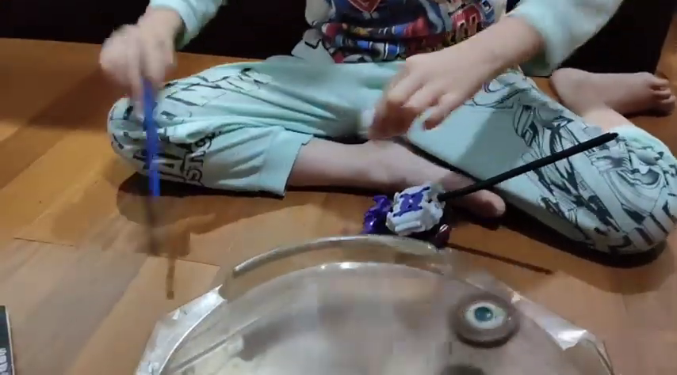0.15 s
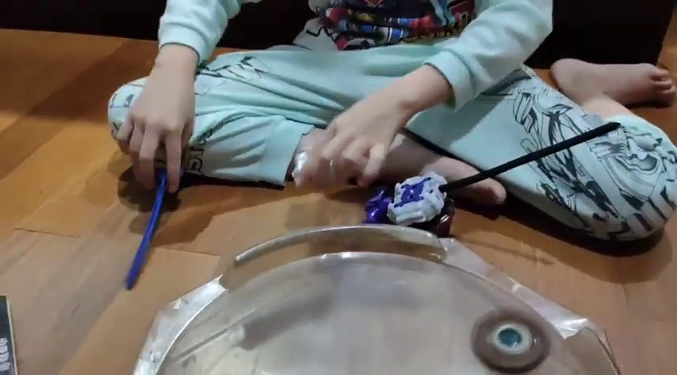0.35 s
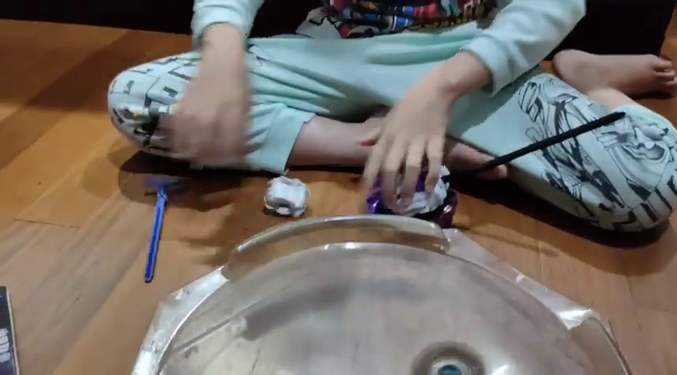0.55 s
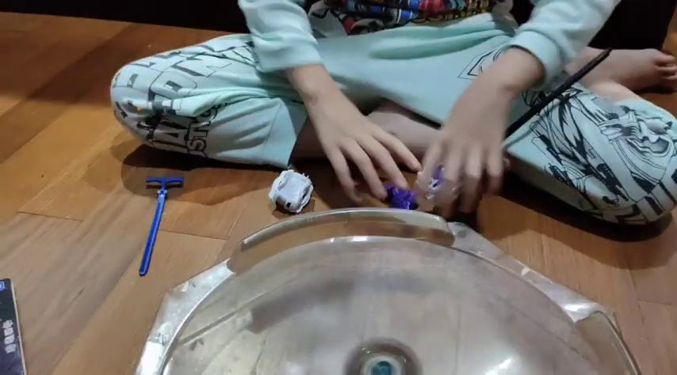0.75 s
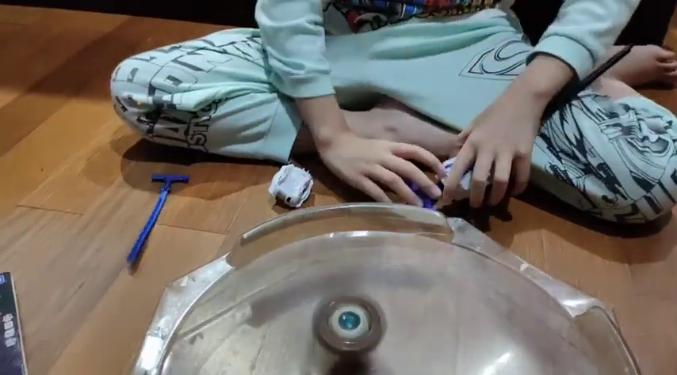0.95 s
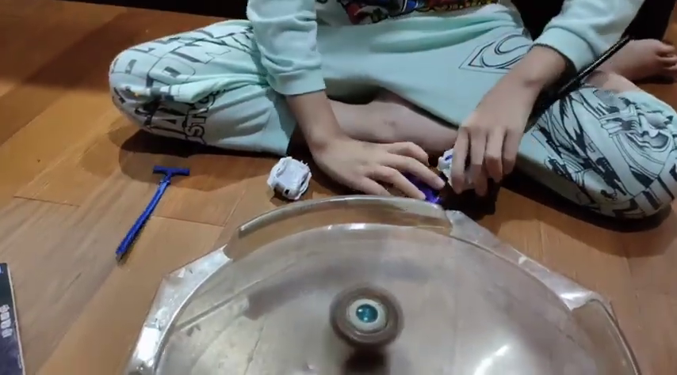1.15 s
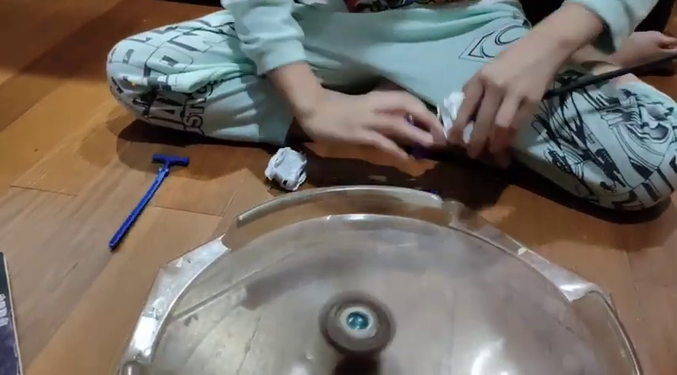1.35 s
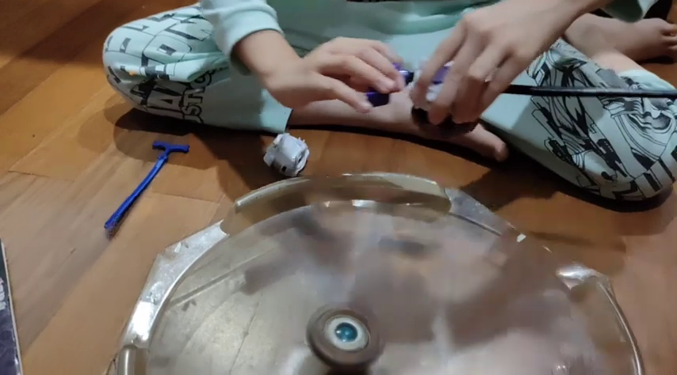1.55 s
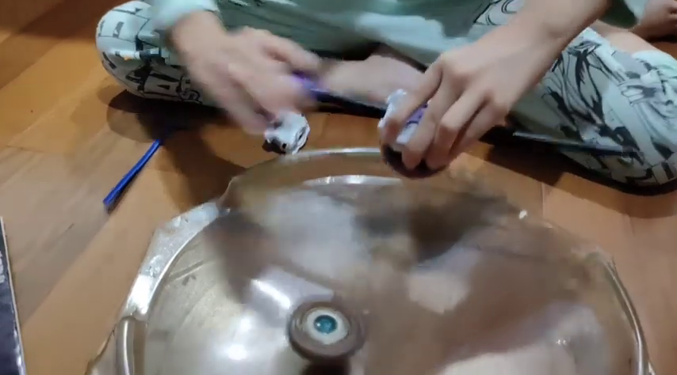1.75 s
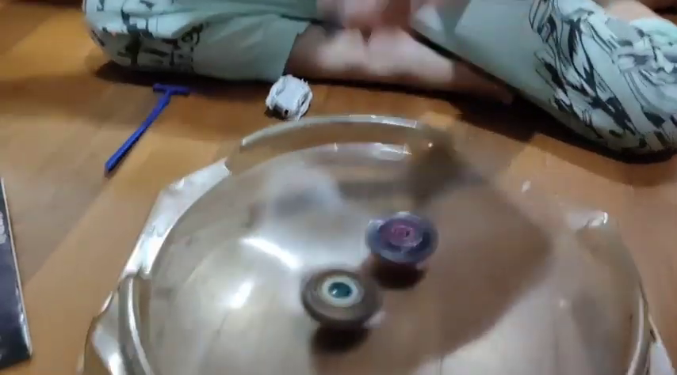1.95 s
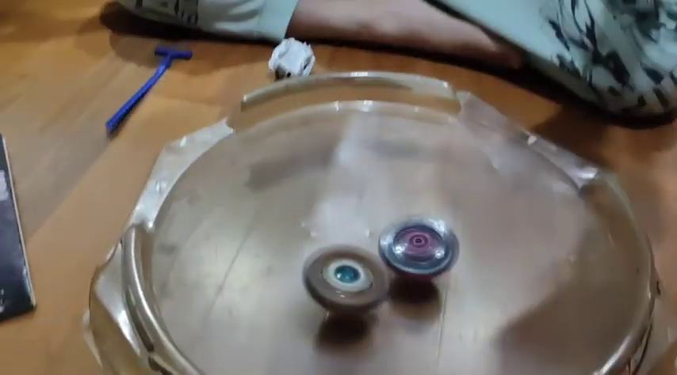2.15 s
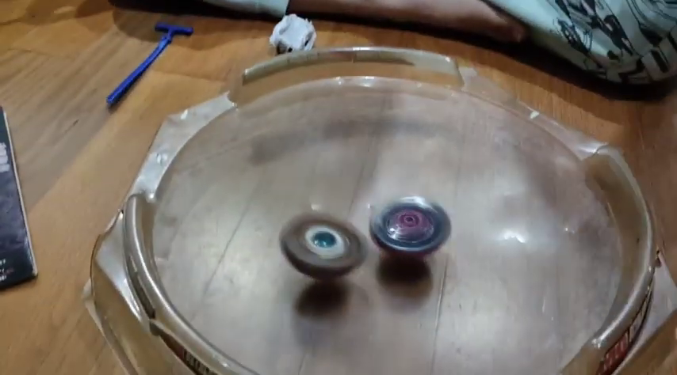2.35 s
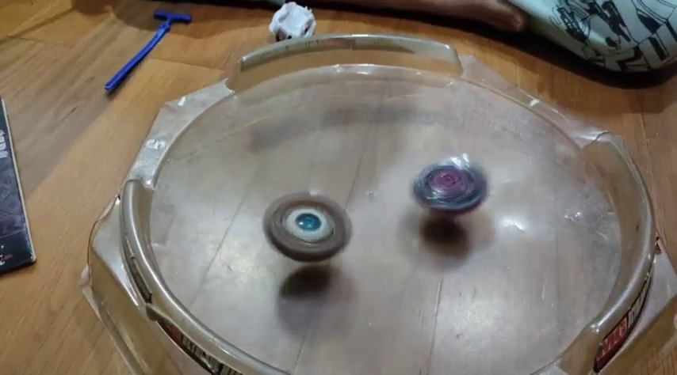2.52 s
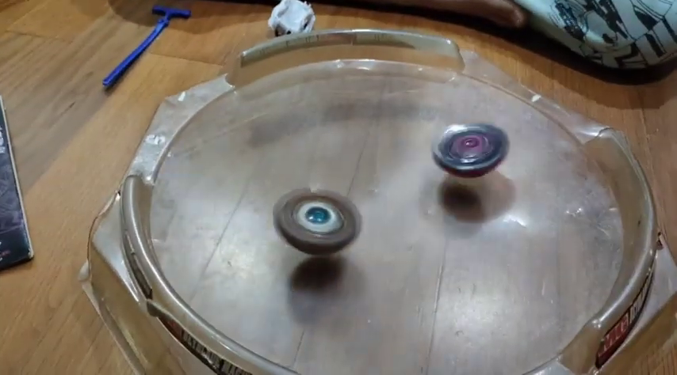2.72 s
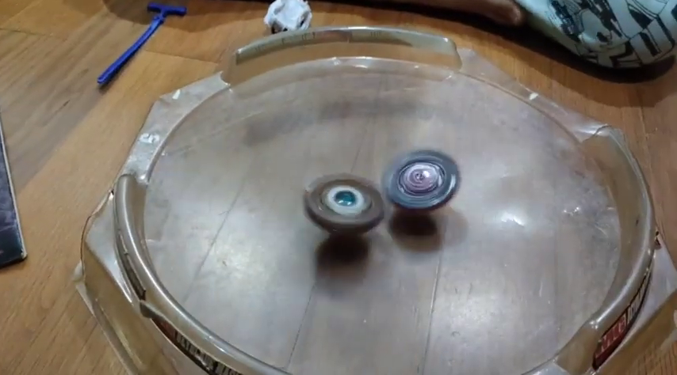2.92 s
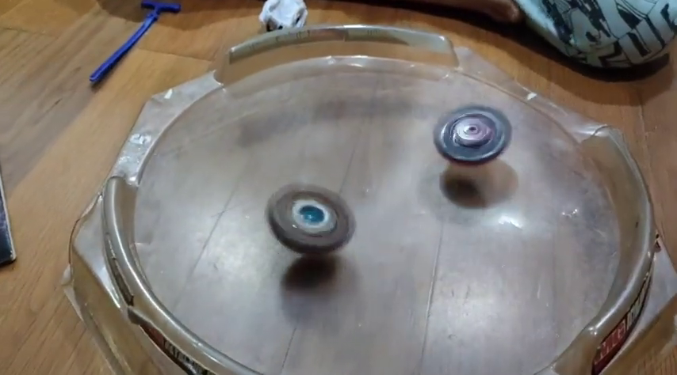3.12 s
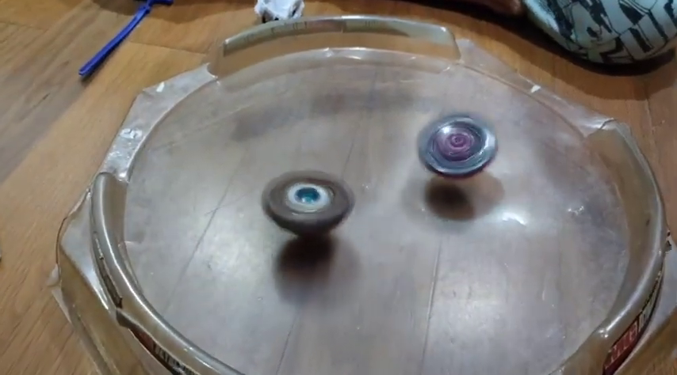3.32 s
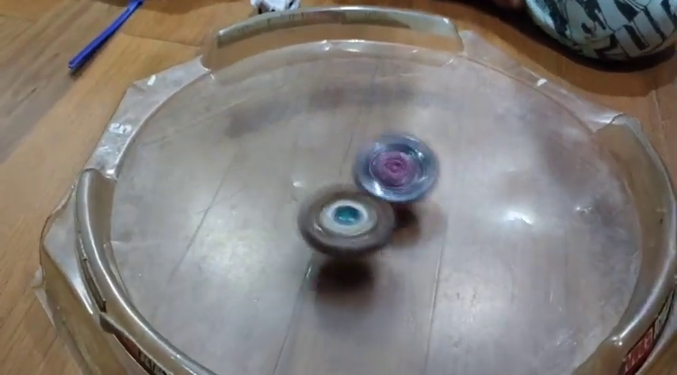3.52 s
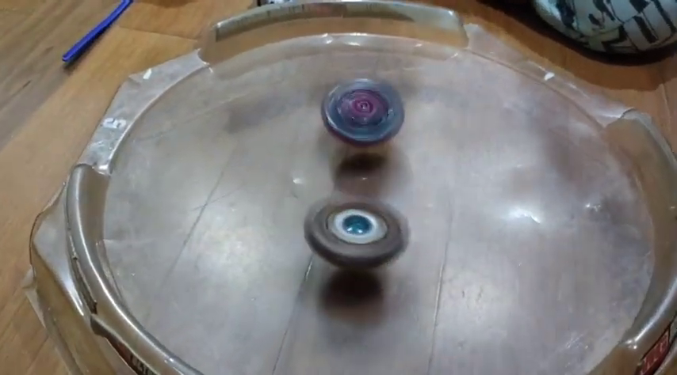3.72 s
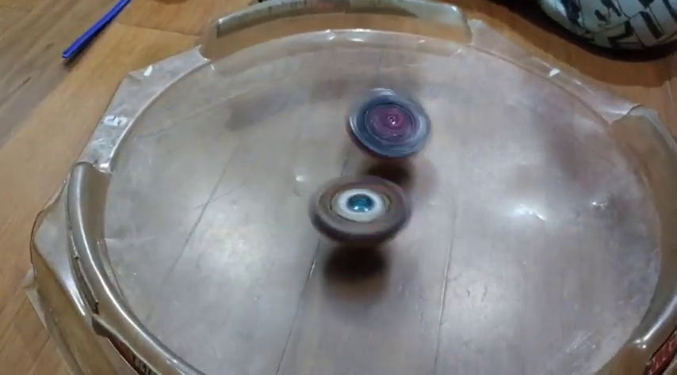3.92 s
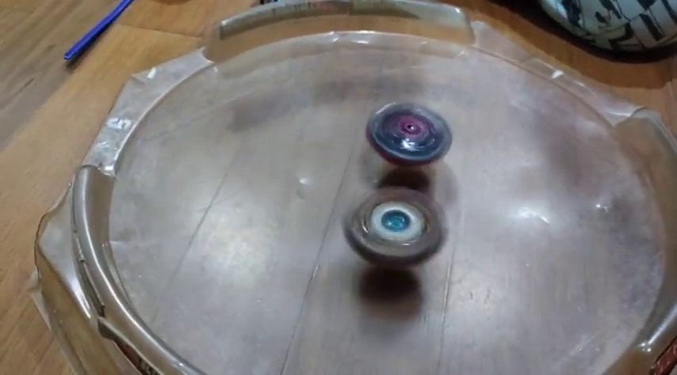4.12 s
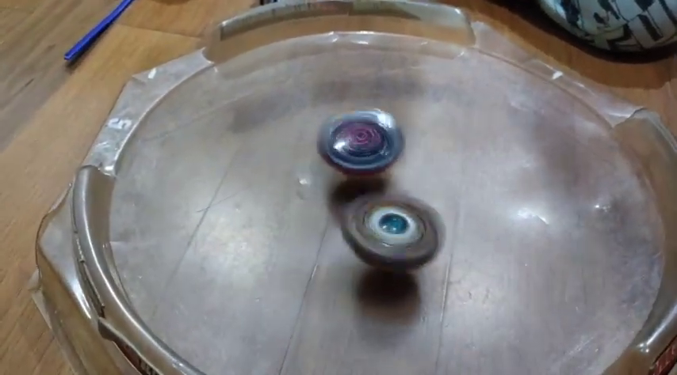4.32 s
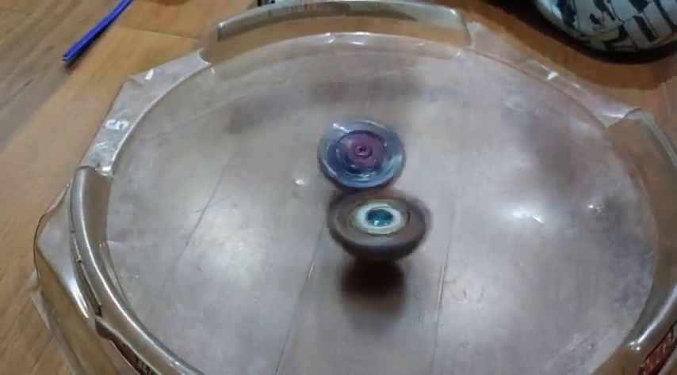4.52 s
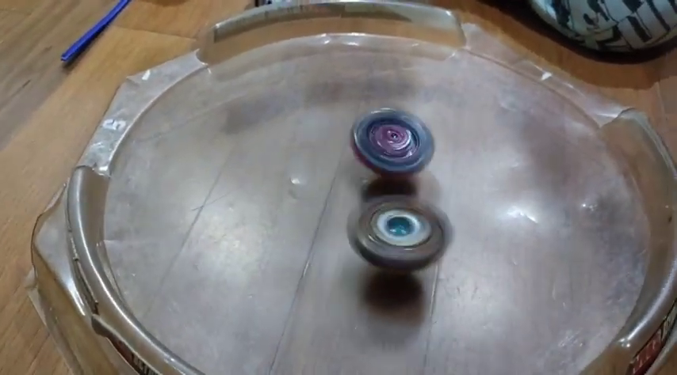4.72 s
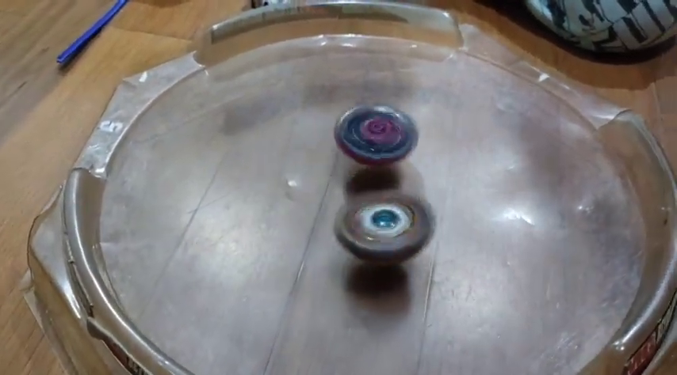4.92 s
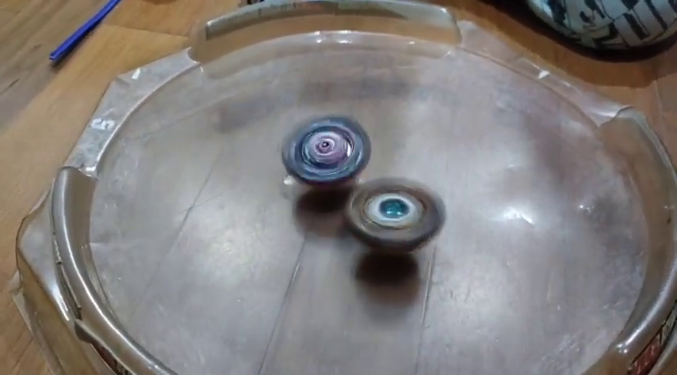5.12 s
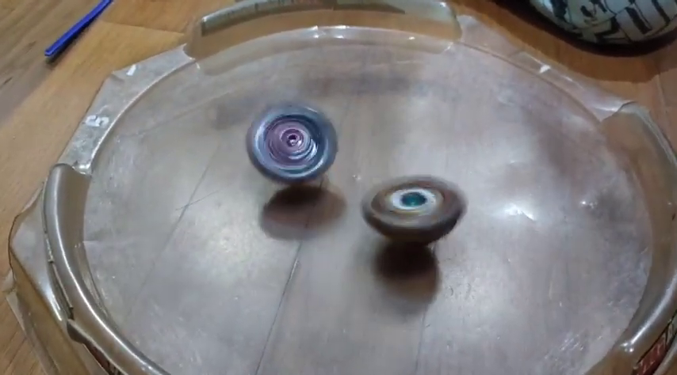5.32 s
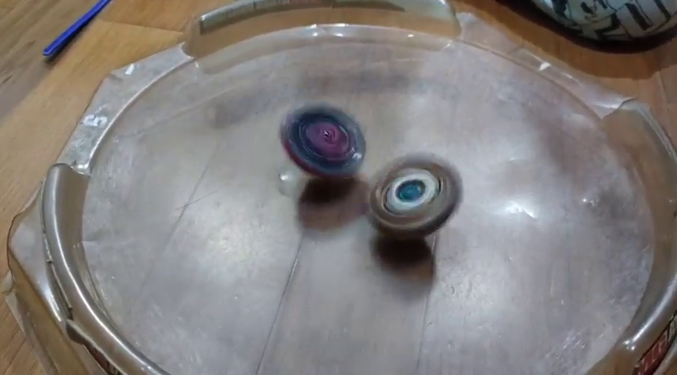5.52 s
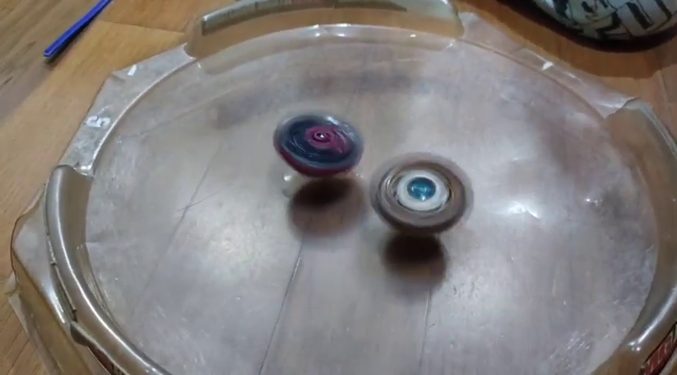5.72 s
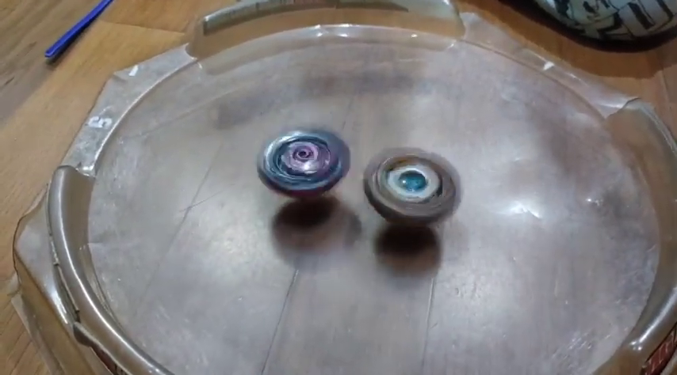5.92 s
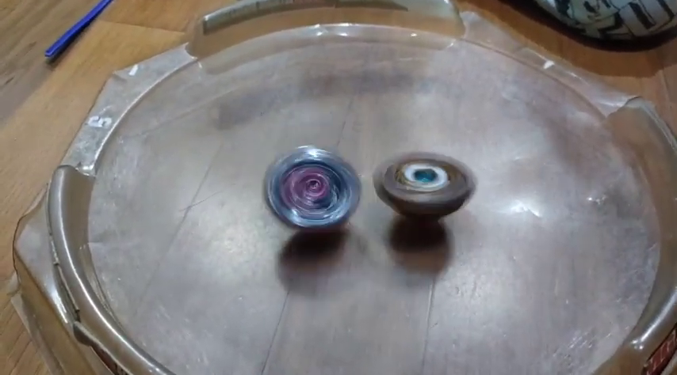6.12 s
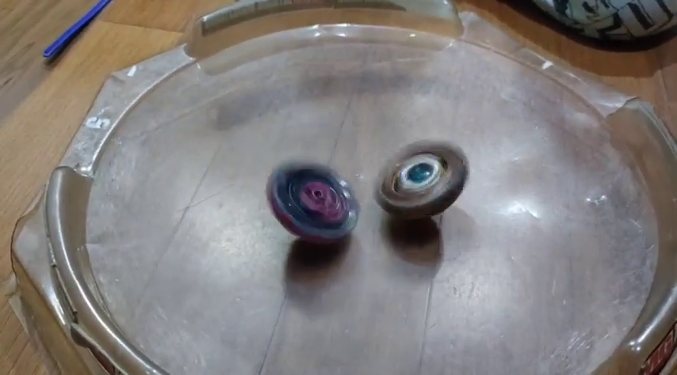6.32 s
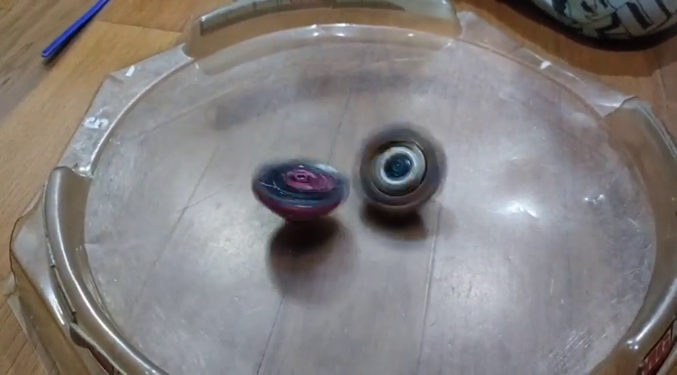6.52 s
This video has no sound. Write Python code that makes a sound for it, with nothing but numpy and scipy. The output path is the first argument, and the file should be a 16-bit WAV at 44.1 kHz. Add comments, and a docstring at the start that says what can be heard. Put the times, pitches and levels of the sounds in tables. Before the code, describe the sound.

A close stereo pickup in a small room with a faint low steady hum. At 0 s a loud hollow knock and bright plastic clatter sound on and around a thin dish; smaller taps follow at 0.2 s, a double clack at 0.55 s and fading rattles to 1 s, over the quickly fading rasp of one spinning top. From 1 to 1.7 s it is nearly quiet, with faint knocks. At about 1.88 s a rip cord gives a very short, harsh ratchet buzz, and the second top lands with hard cracks around 2.05-2.1 s. Bright, dry rim clacks follow at 2.3, 2.4, 2.6, 3.04, 3.63, 4.12, 4.37, 4.6 and 4.76 s, with soft floorboard booms. Between them tips scratch and flutter in rapid ticks. From 5.1 s clashes come often, over a slower wobbling patter, continuing to about 6.6 s.

```python
"""A bright clatter is heard first: launcher parts drop and rattle on a thin plastic dish on a wooden floor.
A rip cord buzzes, a second spinning top lands, and the rims of the two tops clash again and again.
Contacts are impulses with noise sprays that excite the modes of rims, shells, dish and floorboards;
rolling tips and cord teeth are trains of random clicks. A small room adds reverberation and a steady background;
two spaced ports receive a steeply ending band, with faint short noise above its edge at some contacts."""
import sys
import numpy as np
from scipy import signal
from scipy.fft import rfft, irfft, next_fast_len
from scipy.io import wavfile
from scipy.ndimage import uniform_filter1d

SR = 44100
rng = np.random.default_rng(int(sys.argv[2]) if len(sys.argv) > 2 else 0)


def digitize_waveform(pressure):
    """Quantize a signal to 16-bit integers and store it at the path in sys.argv[1].

    Rows of a 2-D input are taken as channels; values are limited to [-1, 1].
    """
    field = np.atleast_2d(pressure).T
    bounded = np.clip(field, -1, 1)
    quanta = np.round(bounded * 32767).astype(np.int16)
    wavfile.write(sys.argv[1], SR, quanta)


N = 293730
T = np.arange(N) / SR
LANDING_S = 2.2    # from here on both tops spin


def amp(db):
    """Logarithmic level: dB to amplitude ratio."""
    return 10 ** (np.asarray(db) / 20)


def rms_one(x):
    """Power normalisation: scale to an rms value of 1."""
    return x / np.sqrt(np.mean(x ** 2) + 1e-20)


def in_time(rows):
    """Level envelopes: the columns of a curve table interpolated linearly at every sample."""
    s, *columns = np.transpose(rows)
    return [np.interp(T, s, column) for column in columns]


def at_hz(points, hz):
    """Spectral envelope: a table interpolated on a logarithmic frequency axis."""
    table_hz, values = np.array(points).T
    return np.interp(np.log(hz + 1), np.log(table_hz), values)


def lowpass(x, order, hz):
    """Butterworth low-pass: the response is maximally flat below the corner."""
    return signal.sosfilt(signal.butter(order, hz, fs=SR, output="sos"), x)


def body(x, modes):
    """Modal superposition: parallel resonances of alternating sign; white noise keeps its power."""
    pulse = np.eye(1, 4096)[0]
    response = 0
    for k, (hz, width_hz, level_db) in enumerate(modes):
        r = np.exp(-np.pi * width_hz / SR)    # a wider resonance decays faster
        poles = [1, -2 * r * np.cos(2 * np.pi * hz / SR), r * r]
        mode = (1 - r * r) * signal.lfilter([1, 0, -1], poles, pulse)
        response = response + (-1) ** k * amp(level_db) * mode
    response = response / np.sqrt(np.sum(response ** 2))
    return signal.oaconvolve(np.atleast_2d(x), response[None], axes=1)[:, :N]


def bursts(times, levels_db, lengths_ms, pans_db, click_db, tail_db, tail_ms, size=6500):
    """Impact excitation: a click with a dying spray of micro-impacts, then a tail; returns (blows, tails)."""
    out = np.zeros((2, 2, N + size))
    ms = np.arange(size) * 1000 / SR
    sprays = rng.standard_normal((len(times), 4, size))
    tail = (1 - np.exp(-ms / 5.0)) * np.exp(-ms / tail_ms) * np.minimum((ms[-1] - ms) / 40, 1)
    for s, level_db, length_ms, pan_db, spray in zip(times, levels_db, lengths_ms, pans_db, sprays):
        at = round(s * SR)
        blow = spray[0] + 0.7 * spray[1:3]    # a shared part and one for each channel
        blow = blow * (1 - np.exp(-ms / 0.83)) * np.exp(-ms / max(length_ms, .5))
        blow = (blow + amp(click_db) * (ms == 0)) * amp([[pan_db / 2], [-pan_db / 2]])
        unevenness = np.clip(rms_one(uniform_filter1d(spray[3], size=200)), -3, 1.5)
        chatter = amp(tail_db + 4.1 * unevenness) * (spray[1:3] + 0.7 * spray[0])
        out[:, :, at:at + size] += amp(level_db) * np.array([blow, tail * chatter])
    return out[:, :, :N]


def grains(per_s, spread_db, clump_db):
    """Shot noise: random clicks of uneven size in clumps, partly shared by both channels; rms 1."""
    sizes = amp(spread_db * np.minimum(rng.exponential(1, (3, N)), 4))
    signs = rng.choice([-1, 1], (3, N))
    clicks = sizes * signs * (rng.random((3, N)) < per_s / SR)
    clumps = rms_one(uniform_filter1d(rng.standard_normal(N), size=500))
    return rms_one((clicks[0] + 0.66 * clicks[1:]) * amp(clump_db * clumps))


# Spectral shape of the steady background: f/Hz, relative spectral level/dB
AIR_SPECTRUM = [(15, -51), (25, -22.5), (100, -10.5), (128, 5.5), (152, -3.5), (199, 0.5), (286, -5.5),
                (808, -8), (2230, -47), (3120, -40.5), (4590, -49.5), (5180, -32.5), (6760, -29.5),
                (8000, -46), (10400, -59.5), (17600, -120)]


def room_air():
    """Filtered noise: the steady background of the house, mostly shared by both channels."""
    shared, left, right = rng.standard_normal((3, N))
    colour = amp(at_hz(AIR_SPECTRUM, np.fft.rfftfreq(N, 1 / SR)))
    noise = np.array([left, right]) + 10.0 * shared
    return amp(-55.5) * rms_one(irfft(rfft(noise) * colour, N))


ROOM_T60_S, ROOM_DB = 0.28, -11.5


def room(x):
    """Diffuse reverberation: an exponentially decaying noise tail of unit energy, its own in each channel."""
    t = np.arange(SR // 2) / SR
    tail = rng.standard_normal((2, len(t))) * amp(-60 * t / ROOM_T60_S) * (t > .004)
    tail = tail / np.sqrt(np.sum(tail ** 2, axis=1, keepdims=True))
    return signal.fftconvolve(x, tail, axes=1)[:, :N]


WHIRR_PER_S, WHIRR_DB, WHIRR_FADE_DB_PER_S = 36, -41.5, 17.5


def whirr():
    """Periodic excitation: the first top, spinning alone, rasps once a turn in a narrow band and calms down."""
    turns = np.diff(np.floor(T * WHIRR_PER_S), prepend=0) * amp(2.3 * rng.standard_normal(N))
    rasp = turns + 0.041 * rng.standard_normal((2, N))
    rasp = rasp * amp(WHIRR_DB - WHIRR_FADE_DB_PER_S * T) * (T < LANDING_S)
    band = [(3340, 700, 0)]
    return body(body(rasp, band), band)    # twice through, for steeper flanks


# Modes of the plastic shells: f/Hz, width/Hz, level/dB (also in tips, knocks and clashes)
SHELL_MODES = [(1864, 960, -4.5), (2360, 320, -0.4), (3290, 790, 2.5), (3930, 1250, 1.5)]
# Modes of the dish: f/Hz, width/Hz, level/dB (also in tips and knocks)
DISH_MODES = [(404, 104, -12.5), (523.5, 71, -4), (646, 81, -3.5), (766.7, 65.4, 0.5), (846.5, 69, 0),
              (965, 122, -1.5), (1115, 131, -3.5), (1228, 200, -6.5)]
# Modes of the hollow under the dish: f/Hz, width/Hz, level/dB (also in tips and knocks)
HOLLOW_MODES = [(163, 78, -1), (251, 92, 0.5), (338, 84, -2.5)]
# Modes of the launcher gear: f/Hz, width/Hz, level/dB
GEAR_MODES = [(5380, 330, -8.5), (5930, 400, -2), (6650, 400, -2), (7420, 490, -2), (7600, 970, -5)]
# Envelope of the rip cord: t/s, relative teeth level/dB, relative housing level/dB
CORD_CURVE = [(1.79, -82, -78), (1.826, -59, -60), (1.87, -47.5, -49.5), (1.894, -21, -27.5),
              (1.956, -18, -24.5), (2.014, -53.5, -57), (2.03, -50.5, -52)]


def rip_cord():
    """Ratchet excitation: teeth race over the gear as fast uneven clicks that also drive the housing."""
    teeth_db, housing_db = in_time(CORD_CURVE)
    pulled = (T > CORD_CURVE[0][0]) & (T < CORD_CURVE[-1][0])
    teeth = pulled * grains(3000, spread_db=3.0, clump_db=1.5)
    housing = body(teeth, SHELL_MODES) + amp(-5.0) * body(teeth, DISH_MODES)
    housing = housing + amp(-14) * body(teeth, HOLLOW_MODES)
    return amp(teeth_db + 5.5) * body(teeth, GEAR_MODES) + amp(housing_db - 1.5) * housing


# Modes of the rims, the two duller ones first: f/Hz, width/Hz, level/dB (also in knocks and clashes)
RIM_MODES = [(5580, 1030, -6), (6010, 700, -4.5), (6432, 394, 3.5), (6474, 626, 5.5), (6980, 1080, -0.5)]
# Envelope of the tips rolling on the dish: t/s, relative drumming level/dB, relative scratch level/dB
SPIN_CURVE = [(0.0, -47, -51), (0.07, -22.5, -35), (0.17, -43, -46), (0.4, -55.5, -55), (0.54, -62, -56),
              (0.6, -46, -46), (0.72, -47, -63), (0.8, -38.5, -49.5), (0.92, -53.5, -64.5),
              (1.0, -42, -56.5), (1.15, -66.5, -78), (1.45, -48.5, -67), (1.58, -69.5, -70),
              (1.75, -49.5, -66), (2.0, -73, -33.5), (2.26, -50, -54.5), (2.39, -40.5, -44),
              (2.55, -56, -47), (2.99, -36, -41.5), (3.17, -48.5, -58), (3.45, -53.5, -51),
              (3.64, -39, -34), (3.76, -40.5, -39), (3.83, -54, -73), (4.04, -46, -55.5),
              (4.12, -38, -30.5), (4.32, -45.5, -44.5), (5.6, -47.5, -50), (6.07, -53.5, -64.5),
              (6.2, -51, -50.5), (6.66, -40.5, -45)]


def tips():
    """Rolling contact: micro-impacts of the tips drum the dish and scratch it with fine grains."""
    drum_db, scratch_db = in_time(SPIN_CURVE)
    drum = grains(3000, spread_db=2.5, clump_db=1.5)
    scratch = grains(2200, spread_db=4.5, clump_db=5.5)
    low = body(drum, DISH_MODES) + amp(-11) * body(drum, HOLLOW_MODES)
    high = body(scratch, RIM_MODES) + amp(-10.0) * body(scratch, SHELL_MODES)
    return amp(drum_db + 1.0) * low + amp(scratch_db) * high


# Runs of wobbles, one touch of the tip each, before the random spread:
# first touch t/s, touches, period/ms, knock level/dB, rim tick level/dB, knock growth/dB per touch
WOBBLE_RUNS = [(2.709, 9, 27, -40, -31, 0.8), (2.972, 7, 23, -31.5, -27, 0.2),
               (3.227, 3, 33, -49, -46, -1.5), (3.313, 7, 32.4, -38.5, -44, 1.24),
               (3.527, 3, 30, -33, -39.5, 4), (3.676, 5, 30.5, -29, -26, -1.45),
               (4.102, 3, 32, -32, -50, 3.5), (4.271, 2, 27, -25.5, -27.5, -6),
               (4.411, 2, 37, -23.5, -24, -5.5), (4.549, 2, 28, -34.5, -24, -4),
               (4.657, 4, 30, -36.5, -36, 2.5), (4.816, 3, 36, -28, -31, -5.5),
               (4.929, 5, 39.5, -29, -25.5, -0.85), (5.208, 11, 47.8, -30, -24, 0.58)]


def wobbles():
    """Precession: the tip touches once a period; rows of t/s, knock/dB, tick/dB with random strength."""
    rows = []
    for first_s, touches, period_ms, knock_db, tick_db, growth_db in WOBBLE_RUNS:
        for k in range(round(touches)):
            rows.append((first_s + k * period_ms / 1000, knock_db + k * growth_db, tick_db + k * growth_db / 2))
    rows = np.array(rows)
    return rows + 2.5 * rng.standard_normal(rows.shape) * [0, 1, 1]


# Contacts of rims and loose parts, relative levels: t/s, peak level/dB, lower crack level/dB,
# floor thump level/dB, level of the noise above the band/dB, left minus right/dB
CLASH_EVENTS = [(0.0135, -18, -26, -44, -43, 21), (0.0235, -14.5, -18.5, -48.5, -34, -11),
                (0.066, -21, -28, -50, -100, -9), (0.1764, -35, -33, -63, -77, -4),
                (0.2088, -26, -33, -59, -100, 2), (0.392, -38, -47, -63, -89, -8),
                (0.5055, -33, -40, -68.5, -83, 3), (0.5162, -27, -35, -66, -55, -2),
                (0.557, -14.5, -18, -64, -51, 2), (0.571, -15.5, -18, -55, -75, -1.5),
                (0.647, -21, -26, -57.5, -79, 3), (0.7377, -32.5, -64, -62, -84, -19),
                (0.7598, -32.5, -43, -54, -53, -16), (0.8036, -40, -40, -58, -91, -10),
                (0.921, -42.5, -50, -66, -90, -13), (1.4052, -45, -48.5, -54, -99, -2),
                (1.728, -38.5, -48, -49, -87, -2), (1.8808, -19, -25, -56.5, -48, -12),
                (1.8926, -14.5, -23, -35.5, -39, -8), (1.9272, -8.5, -33, -28, -100, 4),
                (1.9608, -13, -46, -26.5, -100, 5), (2.048, -14.5, -19.5, -43, -26, -18),
                (2.0527, -12, -31.5, -34, -58, 7.5), (2.0814, -16, -23, -44, -69, -3),
                (2.113, -7.5, -22.5, -31.5, -38, -0.5), (2.2966, -7.5, -23, -32.5, -38.5, 3),
                (2.355, -22, -33, -46.5, -89, -5), (2.4121, -8.5, -26, -37.5, -39, 0.5),
                (2.5671, -9.5, -21, -27.5, -47, 7), (2.6034, -12, -39, -30, -92, 5.5),
                (2.885, -24.5, -60, -51.5, -88, -10), (3.018, -19.5, -37, -48, -35, -7),
                (3.037, -7, -24, -25.5, -33, 8), (3.0426, -9, -26.5, -28.5, -48, 7.5),
                (3.0745, -12.5, -48, -37, -100, 5), (3.594, -20, -28.5, -55, -73, -3),
                (3.618, -10.5, -25.5, -46, -45, 11), (3.632, -8.5, -42, -30, -37, 1),
                (3.646, -12, -22, -27.5, -70.5, 3.5), (3.6773, -15, -67, -35.5, -100, 1),
                (4.1194, -11, -25, -46, -51, 5), (4.1279, -7, -27.5, -35.5, -42, 0.5),
                (4.369, -6, -22, -31, -37.5, 5), (4.587, -23.5, -47, -49.5, -56, -8),
                (4.6198, -8, -21.5, -36, -23, 6), (4.7608, -6, -22.5, -38, -33.5, -1),
                (5.1269, -8.5, -23.5, -33, -47, 10.5), (5.2936, -9.5, -38.5, -31, -32, 8.5),
                (5.308, -7, -19.5, -35.5, -38, 1), (5.4114, -19.5, -45, -74, -100, -8),
                (5.5476, -16, -39, -69.5, -36, -1.5), (5.7214, -8.5, -31, -38.5, -52, -2.5),
                (5.7317, -9, -23, -47.5, -75, -7), (5.851, -25, -40, -66, -100, -1),
                (5.9727, -19, -37, -59, -59, -2.0), (5.9843, -10, -28.5, -50, -49.5, -2.5),
                (6.0637, -21, -45, -72, -100, -4), (6.1854, -10, -30.5, -37, -47, 1),
                (6.1982, -12, -26, -78, -85, 10), (6.3014, -26.5, -39, -46, -100, -1),
                (6.3751, -6, -26, -38, -38, -1.5), (6.453, -23.5, -59, -52, -100, -5),
                (6.5184, -19.5, -46, -58.5, -36, -5), (6.566, -6, -28, -39, -52, -1.5)]
# Lone knocks on dish and floor, relative levels: t/s, peak level/dB, low thud level/dB
KNOCK_EVENTS = [(0.014, -0.5, -25), (0.176, -16.5, -39.5), (0.204, -15, -42), (0.281, -25, -38),
                (0.517, -32.5, -47), (0.556, -9, -38), (0.570, -10.5, -37), (0.645, -20, -54),
                (0.782, -23.5, -66), (0.839, -32.5, -46.5), (0.952, -23.5, -45), (1.111, -33.5, -54),
                (1.284, -36.5, -74), (1.93, -20.5, -32), (2.047, -2.5, -21.5), (2.117, -27, -30),
                (2.397, -28, -43.5), (2.456, -29.5, -45), (2.809, -23.5, -47), (3.24, -35, -68),
                (4.202, -20, -34), (4.377, -14.5, -41.5), (6.075, -32.5, -60), (6.434, -32, -48.5),
                (6.531, -35, -50.5), (6.621, -36, -47)]
KNOCK_MS, RUB_MS = 3.7, 7.3    # a knock is short, a wobbling tip rubs longer


def dish_blows(touches):
    """Superposed impacts: lone knocks, knocks under clashes, wobble touches; t/s, peak/dB, thud/dB, length/ms."""
    under = []
    for s, _, crack_db, thump_db, *_ in CLASH_EVENTS:
        if s > LANDING_S and crack_db > -40:
            under.append((s, crack_db + 1, (crack_db + thump_db) / 2 - 2.5))
    short = [(*row, KNOCK_MS) for row in [*KNOCK_EVENTS, *under]]
    rubs = [(s, knock_db, knock_db - 15.5, RUB_MS) for s, knock_db, _ in touches]
    return np.array(short + rubs)


def knocks(touches):
    """Plate and cavity resonance: blows ring the dish and its hollow; after the landing they also scrape."""
    s, peak_db, thud_db, ms = dish_blows(touches).T
    touch = s - .0015    # the dish takes a moment to swing up after the touch
    blows = sum(bursts(touch, peak_db - 4.5, ms, 0 * s, click_db=16.5, tail_db=-12.5, tail_ms=34.8))
    rings = lowpass(body(blows, DISH_MODES), 4, 1700)
    lows = sum(bursts(touch, thud_db + 5, 0.68 * ms, 0 * s, click_db=18.0, tail_db=-17.5, tail_ms=34))
    thuds = body(lows, HOLLOW_MODES)
    spun = s > LANDING_S
    scrapes = sum(bursts(s[spun], peak_db[spun] - 13.5, 0.92 * ms[spun], 0 * s[spun],
                         click_db=0.5, tail_db=-9.0, tail_ms=30))
    scraping = body(scrapes, RIM_MODES) + amp(-11.0) * body(scrapes, SHELL_MODES)
    scraping = scraping + amp(-4.0) * body(scrapes, [(1650, 950, 0)])
    return rings + thuds + scraping


HARD_DB = -10.7    # above this table peak a clash of the two tops rebounds
REBOUND_S, REBOUND_LOSS_DB = .016, (10.8, 43, 12, 30)    # loss of peak, crack, thump, noise above the band


def contacts(touches):
    """Inelastic rebound: clashes, weaker second touches of hard ones and wobble ticks in the clash columns."""
    blows = np.array(CLASH_EVENTS)
    hard = blows[(blows[:, 1] > HARD_DB) & (blows[:, 0] > CORD_CURVE[-1][0])]
    rebounds = hard - [-REBOUND_S, *REBOUND_LOSS_DB, 0]
    # the rim ticks 8 ms after the tip touches
    ticks = [(s + .008, tick_db, tick_db - 19.5, tick_db - 26.5, -120, 0) for s, _, tick_db in touches]
    return np.vstack([blows, rebounds, ticks])


# Modes of the floorboards under the dish: f/Hz, level/dB, T60/s
BOARD_MODES = [(99.5, 0.5, 0.53), (107.6, 0, 0.57), (130, 9.5, 0.063)]


def floor_thump(s, thump_db):
    """Beating of decaying modes: two close modes start opposed, so the boom of the floorboards swells late."""
    jolts, thump = np.zeros(N), 0
    jolts[np.round(s * SR).astype(int)] = amp(thump_db - 5.5)
    for k, (hz, level_db, t60_s) in enumerate(BOARD_MODES):
        r, w = amp(-60 / (t60_s * SR)), 2 * np.pi * hz / SR
        ring = signal.lfilter([0, np.sin(w)], [1, -2 * r * np.cos(w), r * r], jolts + 1e-18)
        thump = thump + (-1) ** k * amp(level_db) * ring
    return signal.sosfilt(signal.butter(1, 60, "high", fs=SR, output="sos"), thump)


# Modes of the rims ringing on: f/Hz, width/Hz, level/dB
RING_MODES = [(5870, 440, -14), (6860, 97, -0.5), (6270, 58, -5), (6770, 330, 4), (7280, 230, 6.5),
              (7500, 110, 0)]
# Modes of the loose launcher parts: f/Hz, width/Hz, level/dB
LAUNCHER_MODES = [(3025, 490, -0.5), (3600, 660, -3), (4500, 700, -9)]
RATTLE_MS, RATTLE_MS_PER_DB = 6.43, 0.34    # harder blows rattle longer
AFTER_RING_DB = -14.5
DULL_SHARE, DULL_DB = 0.53, -4    # the duller rim ring is weighted between peak and crack


def clashes(touches):
    """Modal impact: rims crack and ring on, shells crack lower, boards thump; also returns short top noise."""
    s, peak_db, crack_db, thump_db, top_noise_db, pan_db = contacts(touches).T
    dull_db = (1 - DULL_SHARE) * peak_db + DULL_SHARE * crack_db + DULL_DB
    ms = RATTLE_MS + RATTLE_MS_PER_DB * peak_db
    blows, tails = bursts(s, peak_db - 1.0, ms, pan_db, click_db=12.5, tail_db=AFTER_RING_DB, tail_ms=17.4)
    duller = sum(bursts(s, dull_db, ms, pan_db, click_db=8.5, tail_db=AFTER_RING_DB + 0.5, tail_ms=24))
    rims = body(blows, RIM_MODES[2:]) + body(tails, RING_MODES) + body(duller, RIM_MODES[:2])
    cracks = sum(bursts(s, crack_db + 4, 0.46 * ms, pan_db,
                        click_db=8.0, tail_db=AFTER_RING_DB - 5.5, tail_ms=25.8))
    dropped = T < CORD_CURVE[0][0]    # until the cord is pulled the lower crack is that of launcher parts
    shells = body(cracks * ~dropped, SHELL_MODES) + body(cracks * dropped, LAUNCHER_MODES)
    heard = top_noise_db > -85
    top_noise, _ = bursts(s[heard], top_noise_db[heard] + 11, 1.1 * ms[heard], pan_db[heard],
                          click_db=3, tail_db=-62, tail_ms=4)
    return rims + shells, floor_thump(s, thump_db), lowpass(top_noise, 6, 9500)


BAND_HZ = 7750


def above_band(x):
    """High-pass filtering: keep only what lies above the band edge."""
    return signal.sosfilt(signal.cheby2(6, 40, BAND_HZ, "high", fs=SR, output="sos"), x)


def scene():
    """Superposition: all sources in the room end steeply at the band edge; faint short noise lies above it."""
    touches = wobbles()
    cracks, thump, top_noise = clashes(touches)
    near = cracks + thump + knocks(touches) + tips() + whirr() + rip_cord()
    heard = near + amp(ROOM_DB) * room(near) + room_air()
    heard = 0.73 * np.tanh(heard / 0.75)    # the loudest peaks are rounded
    in_band = signal.sosfilt(signal.ellip(10, .5, 90, BAND_HZ, fs=SR, output="sos"), heard)
    return in_band + above_band(top_noise)


# Phase by which the left port leads: f/Hz, phase/rad
PORT_LEAD = [(30, 0), (690, -.2), (950, -.5), (1290, .2), (1810, -.7), (3270, 1.5), (3790, 4.6),
             (5600, 4.6), (6370, 6.2), (7240, 1.4), (8100, -1.9), (8350, -4.5)]
# Level difference of the ports: f/Hz, left minus right/dB
PORT_TILT = [(60, 0.5), (100, -10), (180, 1), (310, -0.5), (530, -0.5), (920, 0.5), (1590, -4), (2740, 1),
             (4740, 8), (8180, -6)]


def record(dry):
    """Spaced-pair stereophony: two ports differ in phase and level; the top is cut at 16 kHz."""
    size = next_fast_len(N + 2048)
    hz = np.fft.rfftfreq(size, 1 / SR)
    sides = np.array([[.5], [-.5]])
    ports = amp(sides * at_hz(PORT_TILT, hz)) * np.exp(1j * sides * at_hz(PORT_LEAD, hz))
    x = irfft(rfft(dry, size) * ports, size)[:, :N]
    return signal.sosfilt(signal.cheby2(12, 70, 16000, fs=SR, output="sos"), x)


dry = scene()
out = record(dry)
digitize_waveform(out)
```